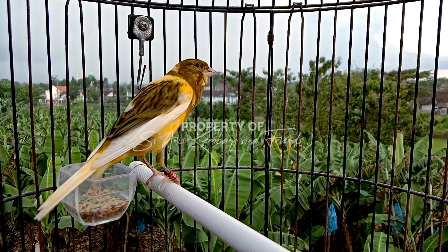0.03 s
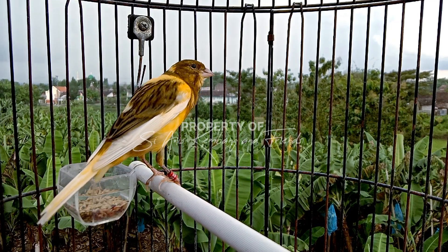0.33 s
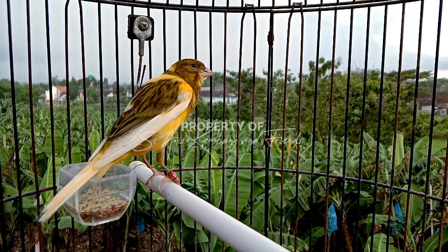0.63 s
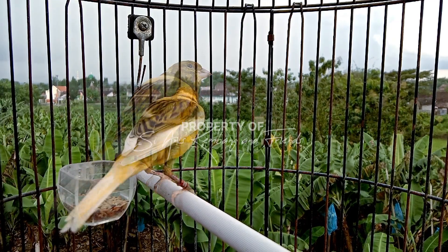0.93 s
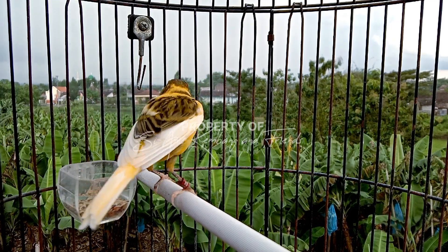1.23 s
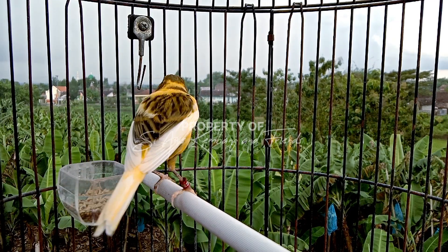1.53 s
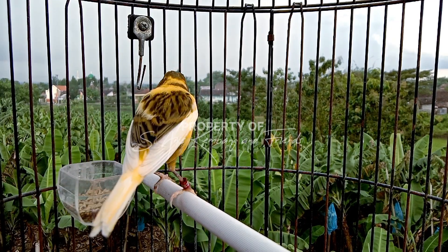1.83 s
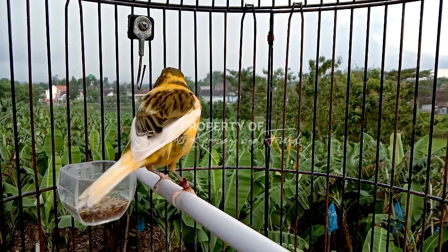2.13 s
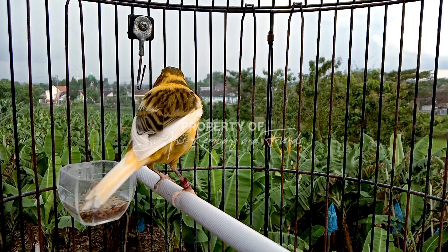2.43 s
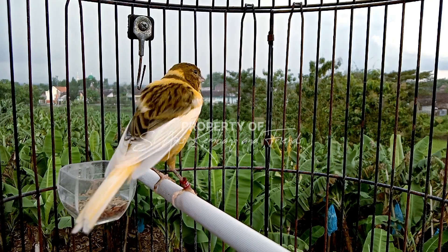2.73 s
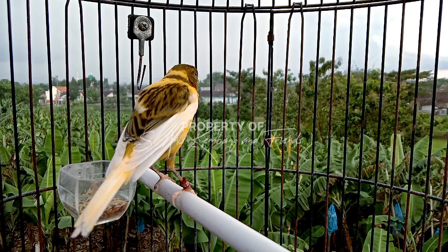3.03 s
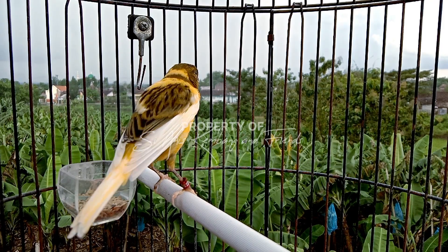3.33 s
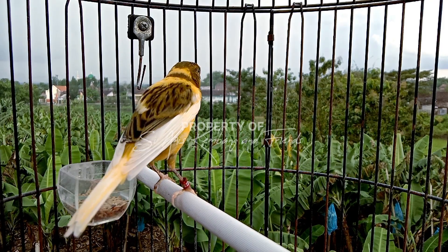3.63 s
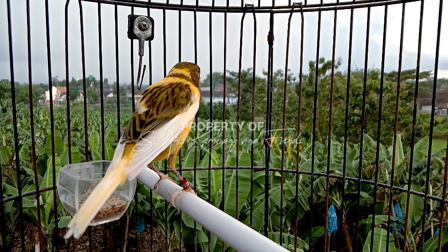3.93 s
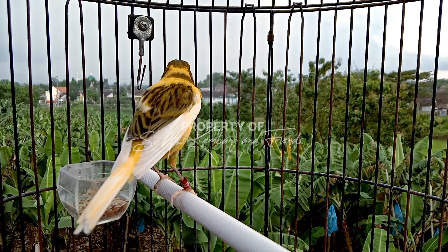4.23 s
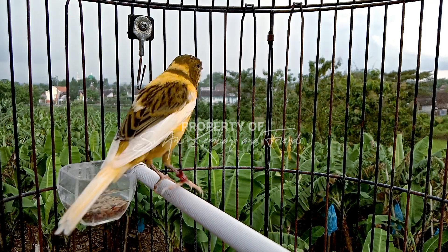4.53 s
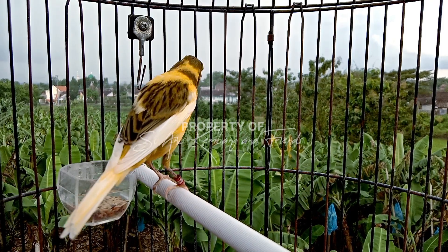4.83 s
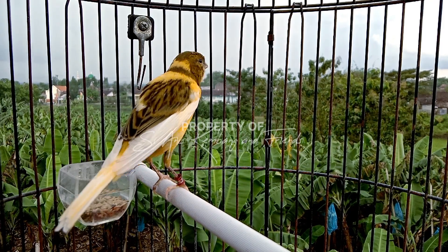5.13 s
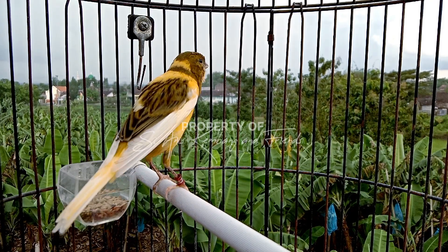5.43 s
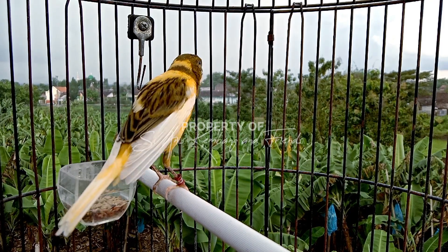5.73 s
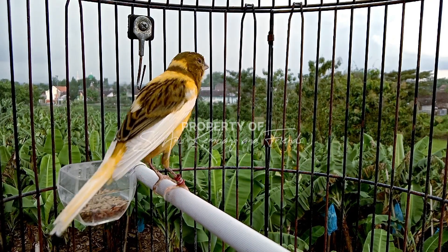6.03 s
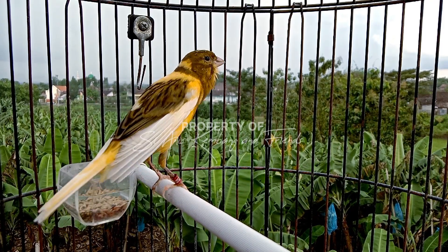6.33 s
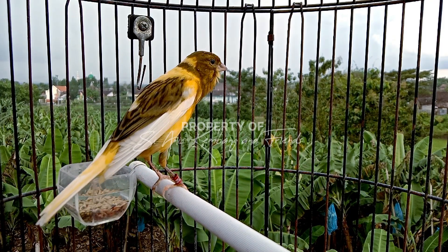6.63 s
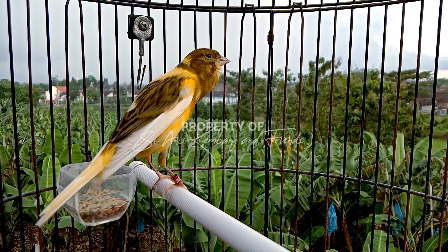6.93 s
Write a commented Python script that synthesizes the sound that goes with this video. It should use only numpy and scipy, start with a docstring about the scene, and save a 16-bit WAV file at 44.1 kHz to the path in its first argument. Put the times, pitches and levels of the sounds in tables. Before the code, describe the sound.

A canary sings close to the microphone in an outdoor cage, high and pure with little echo, over a faint steady low rumble, field hiss and a thin insect-like hiss. At about 0.5 seconds a distant bird gives one soft whistle, and at 0.8 the canary makes a quiet peep. From 1.2 to 2 seconds it sings a fast, swelling trill of tiny falling chirps. After a pause, six falling whistles run from 2.7 to 4.3 seconds, each louder than the last. A rapid ticking roll climbs in pitch from 4.4 to 4.8 seconds and leads into a short held note. Seven rising whistles follow from about 5.1 to 6.6 seconds, with slight catches on the way up. From 6.6 to 7 seconds come six very quick upward whip notes, the loudest sounds of the song.

```python
"""Caged canary outdoors.

A canary sings close by in a wire cage: a peep, a fast trill, six falling whistles, a ticking roll,
rising whistles, whip notes. Each phrase repeats one gesture of the syrinx, a near-pure swept tone;
surfaces near the cage colour it with short reflections. Behind it: low rumble, field hiss, a far bird."""
import sys
import numpy as np
from scipy import signal
from scipy.fft import rfft, irfft, next_fast_len
from scipy.io import wavfile
from scipy.ndimage import uniform_filter1d

SR = 44100
rng = np.random.default_rng(int(sys.argv[2]) if len(sys.argv) > 2 else 0)


def digitize_waveform(pressure):
    """Quantize a signal to 16-bit integers and store it at the path in sys.argv[1].

    Rows of a 2-D input are taken as channels; values are limited to [-1, 1].
    """
    field = np.atleast_2d(pressure).T
    bounded = np.clip(field, -1, 1)
    quanta = np.round(bounded * 32767).astype(np.int16)
    wavfile.write(sys.argv[1], SR, quanta)


N = 307377
BAND_LIMIT_HZ = 16150

# background spectra: f/Hz, relative density/dB
RUMBLE_SPECTRUM = [(15, -55), (25, -21.5), (38, -26.5), (58, -27), (70, -2), (145, 2), (170, 1.5),
                   (237, -8.5), (352, -7.5), (466, -20), (600, -25), (780, -37.5), (1320, -120)]
FIELD_SPECTRUM = [(260, -51.5), (450, -14), (540, -15.5), (685, -12.5), (759, -11), (1060, 0.5),
                  (1390, -6.5), (1590, -11.5), (1950, -8.5), (2800, -17.5), (3250, -14.5), (4370, -21),
                  (5000, -31), (6800, -21.5), (8840, -53.5), (15000, -120)]
INSECT_SPECTRUM = [(6000, -13), (6900, -13), (7500, 7), (8100, 1), (8600, -11.5), (9400, -25.5),
                   (13500, -47), (15200, -18.5), (16200, -26.5)]
# background drift: t/s, relative field level/dB, relative rumble level/dB
BACKGROUND_LEVELS = [(0.0, -78, -63.5), (1.26, -69.5, -66.5), (1.82, -61.5, -61.5), (2.75, -65, -64.5),
                     (3.18, -63, -63), (5.75, -66.5, -65), (6.06, -64.5, -66.5), (6.97, -64.5, -69)]

# syrinx gestures, before stretch and pitch factor: t/ms, f/Hz, relative level/dB
FAR_GESTURE = [(0, 3585, -14), (40, 3555, -2), (95, 3545, 0), (135, 3465, -2), (170, 3300, -9)]
PEEP_GESTURE = [(0, 4260, -15), (19.6, 4500, 1.5), (55, 4570, -6), (80, 4380, 5), (98, 4520, -9)]
TRILL_GESTURE = [(0, 6480, -19), (1.5, 6530, -13), (4, 6250, -10), (8, 4950, -8), (12, 4030, 1),
                 (15, 3750, -4.5), (19, 3250, -19)]
SLUR_GESTURE = [(0, 6960, -11), (14, 7080, -7), (38, 6200, -1), (89, 4650, -3), (109, 4155, -1.5),
                (133, 3960, -2), (166, 3870, 1.5), (184, 3910, -7), (259, 3930, -21)]
TICK_GESTURE = [(0, 4270, -20), (2, 3160, 0), (4, 2656, 6), (6, 2500, -22)]
LINK_GESTURE = [(0, 3990, -24), (12, 4050, 0), (28, 4100, 3), (42, 4300, 3), (65, 4440, -2),
                (105, 4630, -4), (130, 4650, -11), (157, 4580, -17)]
RISE_GESTURE = [(0, 1500, -28), (9, 2250, -25.5), (25.34, 2620, -7.5), (42.5, 3250, -2), (65, 3573, -6.5),
                (83.4, 4080, -0.5), (114, 4447, -3), (143.9, 4860, 1), (170, 5077, -7.5),
                (204, 4910, -13.5)]
LAST_RISE_GESTURE = [(0, 2000, -35), (10.2, 2370, -22), (29.1, 2810, -9), (46.3, 2950, -8.5),
                     (70, 3630, -7.5), (75.6, 3920, 2), (118, 4530, -4.5), (147, 4970, 1.5),
                     (153, 5140, -5.5), (182.5, 5070, -7)]
LEAD_GESTURE = [(0, 1500, -16), (3, 1780, -5), (7, 2260, 0), (12, 2600, -2), (19, 3030, -7),
                (29, 3400, -13)]
WHIP_GESTURE = [(0.0, 2450, -36), (1.5, 3280, -3), (3.0, 3780, 2), (5.0, 4450, -2), (7.0, 6000, -14),
                (10.0, 6220, -25.5), (14.0, 6450, -36)]

# single notes: t/s, effort/dB
FAR_NOTE = [(0.507, -57.5)]
PEEP_NOTE = [(0.762, -52)]
LINK_NOTE = [(4.854, -27)]
LAST_RISE_NOTE = [(6.396, -21.5)]
# phrase swells: t/s, effort/dB
TRILL_SWELL = [(1.228, -59.5), (1.343, -50.5), (1.385, -38.5), (1.52, -38.5), (1.66, -31.5), (1.87, -29.5),
               (1.95, -30.5)]
ROLL_SWELL = [(4.41, -53), (4.455, -43), (4.54, -35), (4.68, -30), (4.735, -29), (4.78, -34.5), (4.81, -33)]
# falling whistles: t/s, effort/dB, stretch, max length/ms
SLUR_NOTES = [(2.664, -37, 0.8, 186), (2.906, -31.5, 0.97, 210), (3.175, -30, 0.94, 219),
              (3.445, -28.5, 0.96, 240), (3.73, -26.5, 0.97, 257), (4.027, -26, 0.97, 254)]
# rising whistles: t/s, effort/dB, stretch, pitch factor, max length/ms
RISE_NOTES = [(5.064, -27, .94, 1.01, 164), (5.268, -26, 1, 1.02, 169), (5.48, -24, .91, 1.064, 186),
              (5.711, -25.5, .88, 1.075, 190), (5.938, -22.5, .93, 1.053, 186),
              (6.163, -22, .98, 1.037, 192)]
# whip notes: t/s, effort/dB, stretch, pitch factor, lead-in effort/dB
WHIP_NOTES = [(6.6529, -15.5, 0.96, 1.102, -41.5), (6.7211, -16.5, 1.07, 1.013, -35.5),
              (6.7878, -15.5, 0.85, 1.02, -37.5), (6.8552, -17, .85, 0.96, -36.5),
              (6.9224, -16, .91, 0.963, -36.5), (6.988, -16, 0.98, .97, -34.5)]
# breaks in the voice: f/Hz
LINK_BREAKS_HZ = [4100]
RISE_BREAKS_HZ = [2950, 3550, 4400]

# harmonics from the 2nd up, before drive and colour: level/dB
TRILL_HARMONICS_DB = [-15, -42]
SLUR_HARMONICS_DB = [-32, -35]
RISE_HARMONICS_DB = [-34, -33, -54]
WHIP_HARMONICS_DB = [-41, -42, -42]
# overtone response of beak and microphone: f/Hz, gain/dB
OVERTONE_RESPONSE = [(4000, -6), (6000, -2), (6900, 5), (7800, 5), (9500, 1), (10800, -3), (11700, -23),
                     (12700, -11), (13900, -11), (14500, 8), (15400, 13), (16100, 6)]
# near reflections, per phrase as the head turns: delay/ms, gain
TRILL_REFLECTIONS = [(1.085, 0.36), (1.49, 0.15), (2.22, 0.12)]
SLUR_REFLECTIONS = [(0.299, 0.17), (0.692, 0.16), (0.991, 0.21), (1.354, 0.5), (1.734, 0.027),
                    (1.972, 0.05), (2.363, 0.13), (7.057, 0.09)]
TICK_REFLECTIONS = [(1.145, 0.36), (1.393, 0.4)]
RISE_REFLECTIONS = [(0.539, 0.37), (1.198, 0.2), (1.416, 0.17), (1.815, 0.094), (2.126, 0.11),
                    (2.665, 0.17), (8.322, 0.082), (8.427, 0.068)]
WHIP_REFLECTIONS = [(0.6, 0.044), (1.073, 0.27), (1.203, 0.33), (2.2, 0.23)]


def amp(db):
    """dB to gain."""
    return 10 ** (np.asarray(db) / 20)


def unit_rms(x):
    """Scale to rms 1."""
    return x / np.sqrt(np.mean(x ** 2) + 1e-20)


def spectrum_db(points, hz):
    """Interpolate a spectrum over log frequency."""
    at_hz, db = np.transpose(points)
    return np.interp(np.log(hz + 1), np.log(at_hz + 1), db)


def add(mix, start_s, sound):
    """Mix in at start_s."""
    part = mix[round(start_s * SR):][:len(sound)]
    part += sound[:len(part)]


def wander(size, rate_hz):
    """Smooth noise, rms about 1."""
    span = max(size, SR)
    lowpass = np.exp(-(np.fft.rfftfreq(span, 1 / SR) / rate_hz) ** 2)
    return unit_rms(irfft(rfft(rng.standard_normal(span)) * lowpass, span))[:size]


def patchy_noise(spectrum, patchy_db):
    """Coloured noise with patches drifting in time and frequency."""
    hz = np.fft.rfftfreq(4096, 1 / SR)
    real, imag, patches = rng.standard_normal((3, N // 1024 + 5, len(hz)))
    patches = uniform_filter1d(patches, size=5, axis=0)
    patches = unit_rms(uniform_filter1d(patches, size=12, axis=1))
    frames = (real + 1j * imag) * amp(spectrum_db(spectrum, hz) + patchy_db * patches)
    return unit_rms(signal.istft(frames.T, nperseg=4096, noverlap=3072)[1][:N])


def outdoors():
    """Lumpy far rumble with a low drone, field hiss and a thin, steady insect-like band."""
    t = np.arange(N) / SR
    at_s, *levels_db = np.transpose(BACKGROUND_LEVELS)
    field_db, rumble_db = (np.interp(t, at_s, db) for db in levels_db)
    lumps = wander(next_fast_len(N), rate_hz=13.5)[:N]
    drone = amp(-7) * patchy_noise([(60, -60), (74, -10), (79, 0), (88, -24), (110, -80)], patchy_db=0)
    rumble = amp(4) * patchy_noise(RUMBLE_SPECTRUM, patchy_db=4)
    field = amp(field_db + 4.5 + .51 * lumps) * patchy_noise(FIELD_SPECTRUM, patchy_db=4)
    insects = amp(-70) * patchy_noise(INSECT_SPECTRUM, patchy_db=1)
    return amp(rumble_db + 1.2 * lumps) * (rumble + drone) + field + insects


def voice_catches(ms, sweep_hz, breaks_hz, scatter_ms=3, width_ms=2.2):
    """A brief flick, up or down, near each crossing of a break in the voice."""
    flick = np.zeros(len(ms))
    for hz in breaks_hz:
        at_ms = ms[np.argmin(abs(sweep_hz - hz))] + scatter_ms * rng.standard_normal()
        depth = rng.choice([-1, 1]) * (.5 + rng.random())
        flick += depth * np.exp(-((ms - at_ms) / width_ms) ** 2)
    return flick


def syllable(gesture, harmonics_db, jitter, hiss_db, growth, breaks_hz,
             effort_db, stretch=1, pitch=1, max_ms=np.inf):
    """One syrinx gesture: returns a near-pure tone with hiss, and its unevenly flaring overtones."""
    at_ms, gesture_hz, gesture_db = np.transpose(gesture)
    length_ms = min(at_ms[-1] * stretch, max_ms)
    ms = np.arange(0, length_ms, 1000 / SR)
    sweep_hz = pitch * np.interp(ms / stretch, at_ms, gesture_hz)
    flick = voice_catches(ms, sweep_hz, breaks_hz)
    glide_hz_per_s = abs(np.gradient(sweep_hz)) * SR
    unsteady = .25 + uniform_filter1d(np.minimum(glide_hz_per_s / 15000, 1), size=300)
    hz = sweep_hz * (1 + .06 * flick + jitter * unsteady * wander(len(ms), 300))
    phase = 2 * np.pi * np.cumsum(hz) / SR

    flutter_db = 1.6 * unsteady * wander(len(ms), 170)
    contour_db = np.interp(ms / stretch, at_ms, gesture_db) + flutter_db - flutter_db.mean()
    attack_ms, release_ms = .012 * length_ms, .035 * length_ms
    ramp = np.clip(np.minimum(ms / attack_ms, (length_ms - ms) / release_ms), 0, 1)
    choke_db = -4.5 * abs(flick)
    envelope = amp(effort_db + contour_db + choke_db) * np.sin(np.pi / 2 * ramp) ** 2

    rasp_rad = .05 * (unsteady + 2 * abs(flick)) * wander(len(ms), 1300)
    # louder notes are brighter, the highest purer; growth ties brightness to the contour
    drive_db = .5 * (effort_db + 26) + growth * contour_db - .013 * np.maximum(hz - 5500, 0)
    overtones = np.zeros(len(ms))
    for k, level_db in enumerate(harmonics_db, 2):
        in_band = k * hz < BAND_LIMIT_HZ + 1000
        flare_db = 4 * unsteady * np.minimum(wander(len(ms), 90), 1)
        overtones += in_band * amp(level_db + drive_db + flare_db) * np.sin(k * (phase + rasp_rad))
    hiss = (amp(hiss_db + drive_db) + amp(-42) * abs(flick)) * rng.standard_normal(SR)[:len(ms)]
    return envelope * (np.sin(phase) + hiss), envelope * overtones


def phrase(gesture, notes, reflections=(), harmonics_db=(),
           jitter=.003, hiss_db=-70, growth=.4, breaks_hz=()):
    """One gesture per note; sweeps swell and dip across the comb of the reflections."""
    tones, overtones = np.zeros((2, N))
    for start_s, *note in notes:
        tone, upper = syllable(gesture, harmonics_db, jitter, hiss_db, growth, breaks_hz, *note)
        add(tones, start_s, tone)
        add(overtones, start_s, upper)
    size = next_fast_len(N + 4096)
    hz = np.fft.rfftfreq(size, 1 / SR)
    direct = rfft(tones, size) + rfft(overtones, size) * amp(spectrum_db(OVERTONE_RESPONSE, hz))
    comb = 1 + sum(gain * np.exp(-2j * np.pi * hz * ms / 1000) for ms, gain in reflections)
    return irfft(direct * comb, size)[:N]


def scatter(x, t60_s, wet_db):
    """Add a diffuse tail of faint reflections."""
    t = np.arange(SR // 2) / SR
    tail = rng.standard_normal(len(t)) * amp(-60 * t / t60_s) * np.minimum(t / .004, 1)
    return x + amp(wet_db) * signal.oaconvolve(x, tail / np.linalg.norm(tail))[:N]


def far_bird():
    """One soft whistle from across the field."""
    return scatter(phrase(FAR_GESTURE, FAR_NOTE, jitter=.0028), t60_s=.81, wet_db=-5.5)


def peep():
    """The canary's quiet opening note."""
    return phrase(PEEP_GESTURE, PEEP_NOTE, harmonics_db=[-14], jitter=.004)


def late_bounce(x, delay_ms, bounce_db):
    """A farther surface returns only each sweep's low end; the high end is beamed past it."""
    band = signal.butter(2, [3500, 4500], "bandpass", fs=SR, output="sos")
    delay = round(delay_ms * SR / 1000)
    return x + amp(bounce_db) * np.pad(signal.sosfilt(band, x), (delay, 0))[:N]


def cage_ring(x, hz, width_hz, t60_s, ring_db):
    """One band lingers among the bars and roof."""
    band = signal.butter(2, [hz - width_hz / 2, hz + width_hz / 2], "bandpass", fs=SR, output="sos")
    return x + signal.sosfilt(band, scatter(x, t60_s, ring_db) - x)


def trill(count=21, beat_s=.0353, early_s=.0115, settle_beats=1.8):
    """Falling chirps settle into a steady beat; sung facing away, so more arrives scattered."""
    beat = np.arange(count)
    start_s = 1.2388 + beat_s * beat - early_s * np.exp(-beat / settle_beats)
    effort_db = np.interp(start_s, *np.transpose(TRILL_SWELL))
    stretch, pitch = (1 + rng.standard_normal((count, 2)) * [.045, .013]).T
    chirps = phrase(TRILL_GESTURE, zip(start_s, effort_db, stretch, pitch), TRILL_REFLECTIONS,
                    TRILL_HARMONICS_DB, jitter=.0088, hiss_db=-20, growth=.44)
    chirps = late_bounce(chirps, delay_ms=8.2, bounce_db=-11)
    chirps = scatter(chirps, t60_s=.11, wet_db=-15.5)
    return cage_ring(chirps, hz=3950, width_hz=700, t60_s=.06, ring_db=-6)


def falling_whistles():
    """Slurs, each louder than the last, level out and beat with their own ring at the bend."""
    notes = [(start_s, db, stretch, 1, max_ms) for start_s, db, stretch, max_ms in SLUR_NOTES]
    # negative growth: the octave outlasts the tone
    slurs = phrase(SLUR_GESTURE, notes, SLUR_REFLECTIONS, SLUR_HARMONICS_DB, jitter=.007, growth=-.25)
    return cage_ring(slurs, hz=4250, width_hz=600, t60_s=.12, ring_db=-8)


def roll(count=18, beat_s=.02153, drag_s=.0325, climb_beats=3.65):
    """Ticks climb, swell, lengthen and slow; alternate ones draw apart, high and low."""
    beat = np.arange(count)
    progress = beat / beat[-1]
    split = (-1) ** beat * progress
    start_s = 4.4107 + beat_s * beat + drag_s * progress ** 4
    pitch = 1.062 * (1 - .376 * np.exp(-beat / climb_beats)) * (1 + .092 * split)
    effort_db = np.interp(start_s, *np.transpose(ROLL_SWELL)) + 1.5 * split
    stretch = np.linspace(.82, 1.13, count)
    return phrase(TICK_GESTURE, zip(start_s, effort_db, stretch, pitch), TICK_REFLECTIONS,
                  harmonics_db=[-30, -33, -44], jitter=.015, hiss_db=-42)


def rising_whistles():
    """A held linking note, then seven upward sweeps; the voice catches on the way up."""
    link = phrase(LINK_GESTURE, LINK_NOTE, harmonics_db=[-27, -24], jitter=.011,
                  breaks_hz=LINK_BREAKS_HZ)
    rises = phrase(RISE_GESTURE, RISE_NOTES, RISE_REFLECTIONS, RISE_HARMONICS_DB,
                   jitter=.0062, breaks_hz=RISE_BREAKS_HZ)
    last = phrase(LAST_RISE_GESTURE, LAST_RISE_NOTE, RISE_REFLECTIONS, RISE_HARMONICS_DB,
                  jitter=.0041, breaks_hz=RISE_BREAKS_HZ[1:])
    return link + rises + last


def whips(lead_s=.0295):
    """Each note: a soft low lead-in, then a very fast upward crack."""
    lead_notes = [(start_s - lead_s, lead_db) for start_s, *_, lead_db in WHIP_NOTES]
    leads = phrase(LEAD_GESTURE, lead_notes, harmonics_db=[-18], jitter=.022)
    cracks = phrase(WHIP_GESTURE, [note[:-1] for note in WHIP_NOTES], WHIP_REFLECTIONS,
                    WHIP_HARMONICS_DB, jitter=.017, hiss_db=-37.5)
    return leads + cracks


def canary():
    """The song, with a short and a longer tail from the surroundings."""
    song = peep() + trill() + falling_whistles() + roll() + rising_whistles() + whips()
    song = scatter(song, t60_s=.045, wet_db=-19)
    return scatter(song, t60_s=.35, wet_db=-28)


def scene():
    """Mono mix."""
    return (canary() + far_bird() + outdoors())[None]


def record(dry):
    """Recorder band limit."""
    lowpass = signal.firwin(401, BAND_LIMIT_HZ, window=("kaiser", 8), fs=SR)
    return signal.oaconvolve(dry, lowpass[None], "same")


dry = scene()
out = record(dry)
digitize_waveform(out)
```